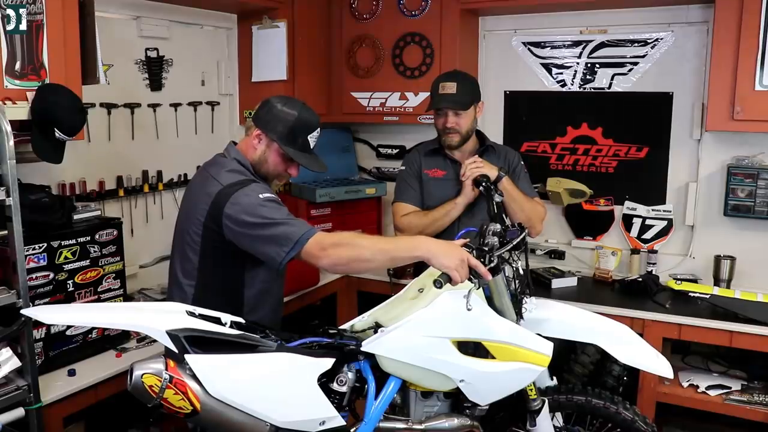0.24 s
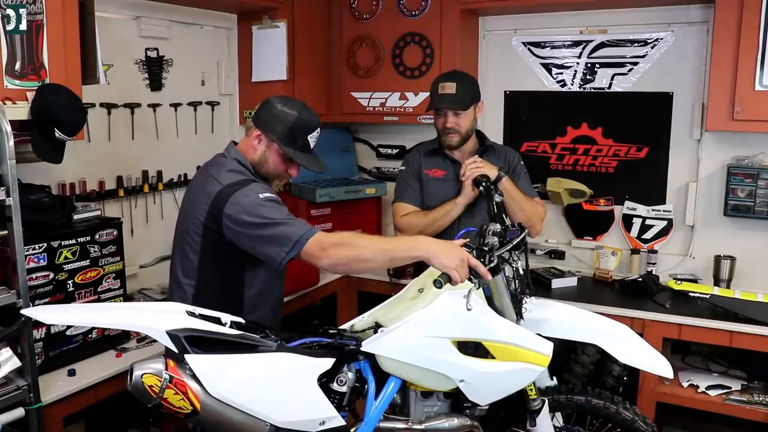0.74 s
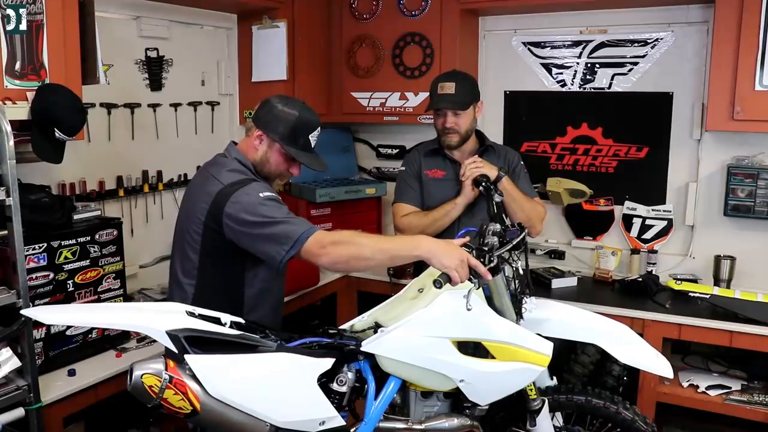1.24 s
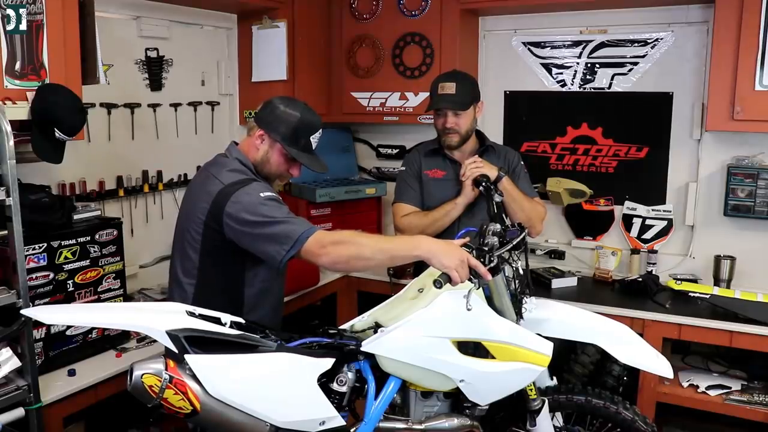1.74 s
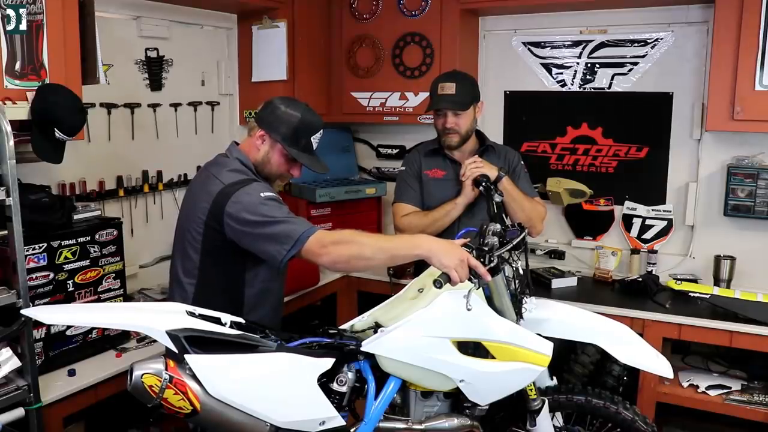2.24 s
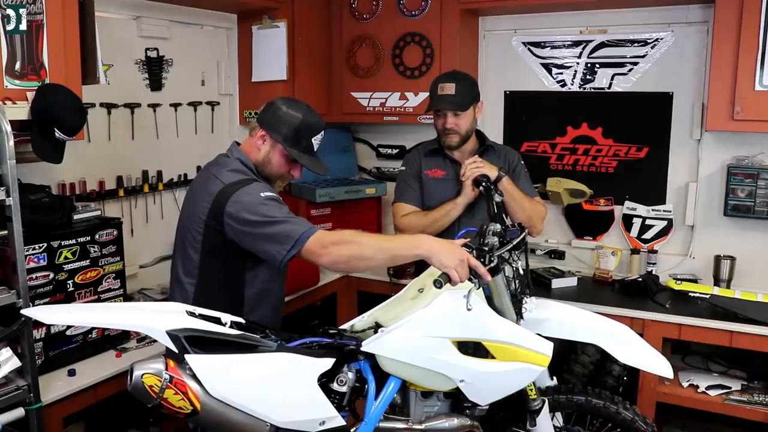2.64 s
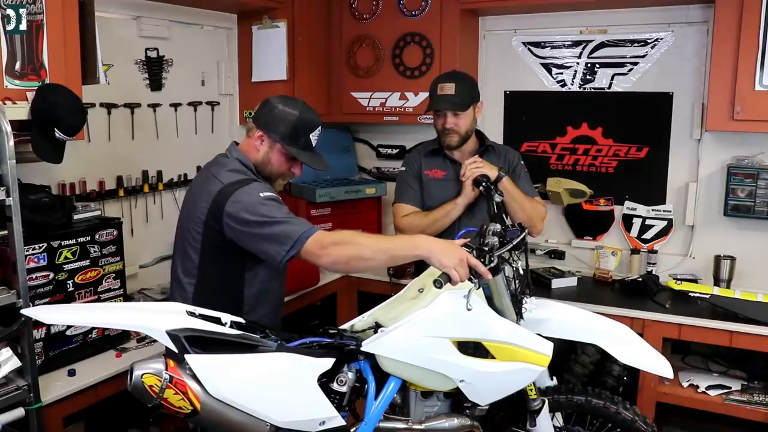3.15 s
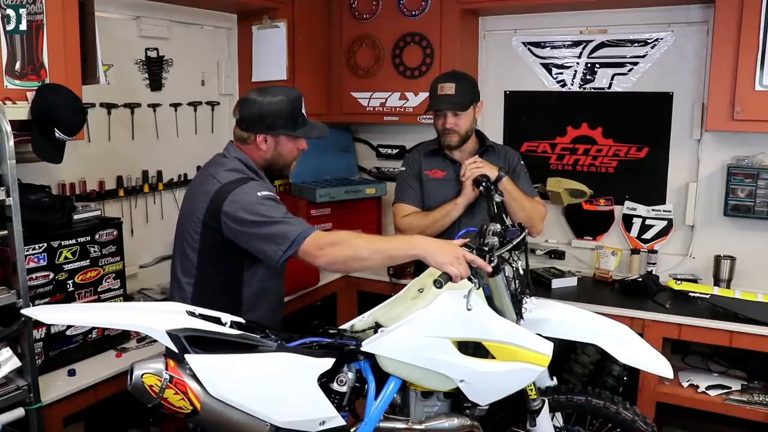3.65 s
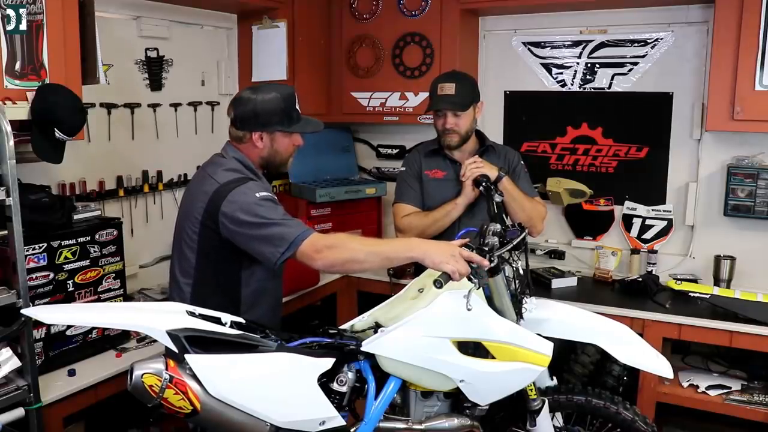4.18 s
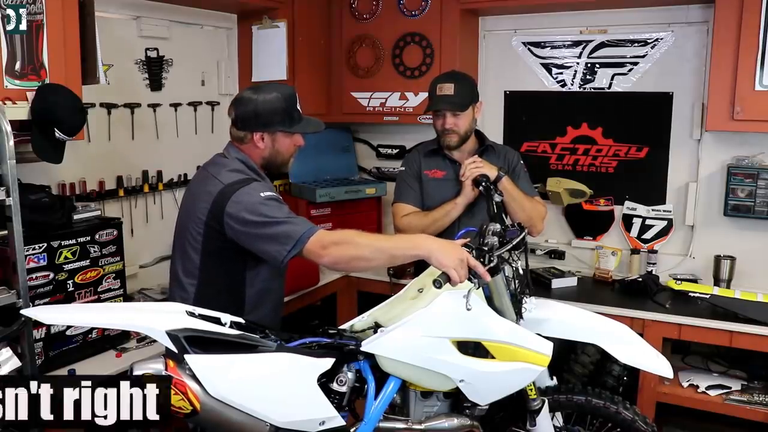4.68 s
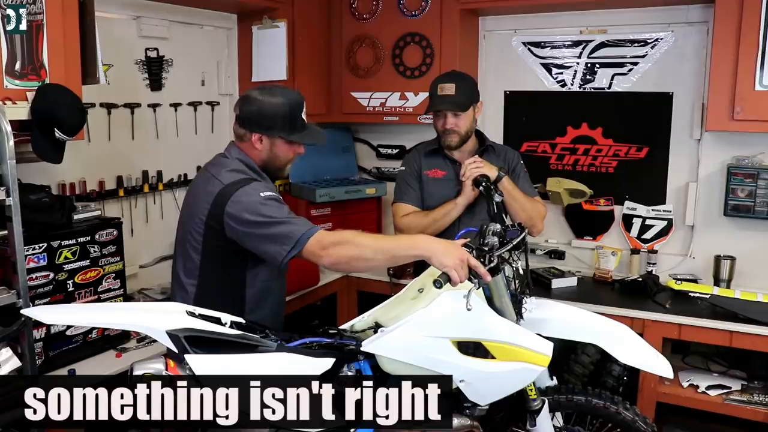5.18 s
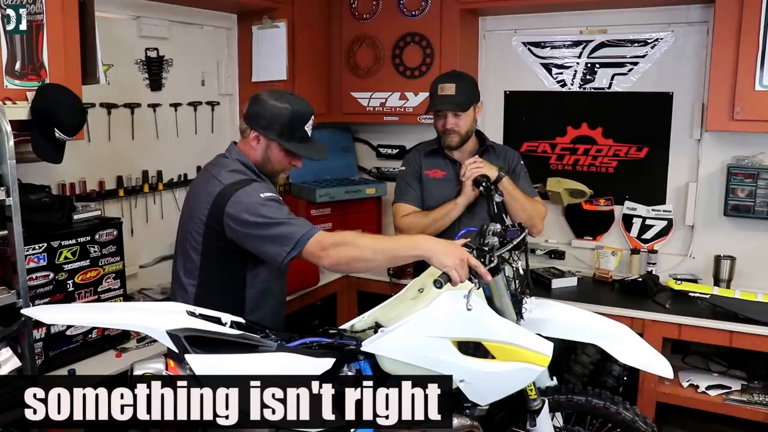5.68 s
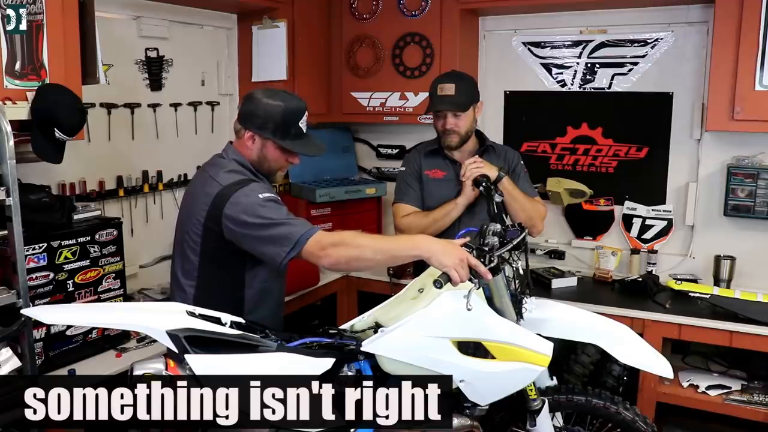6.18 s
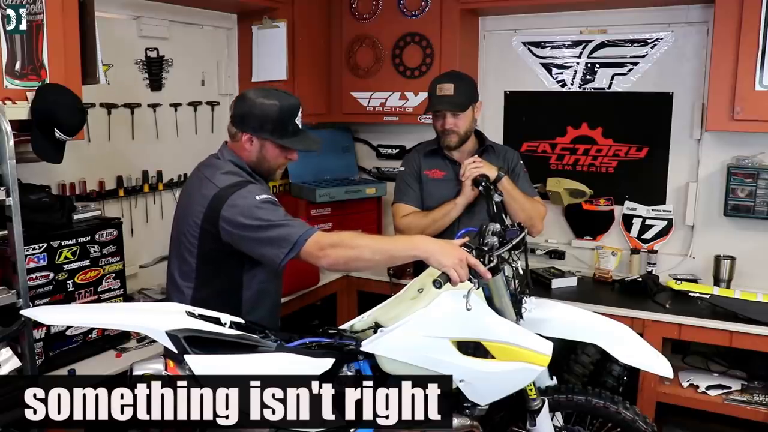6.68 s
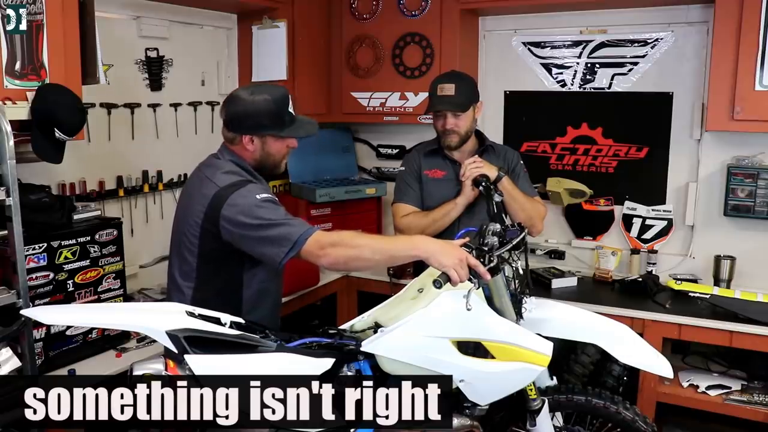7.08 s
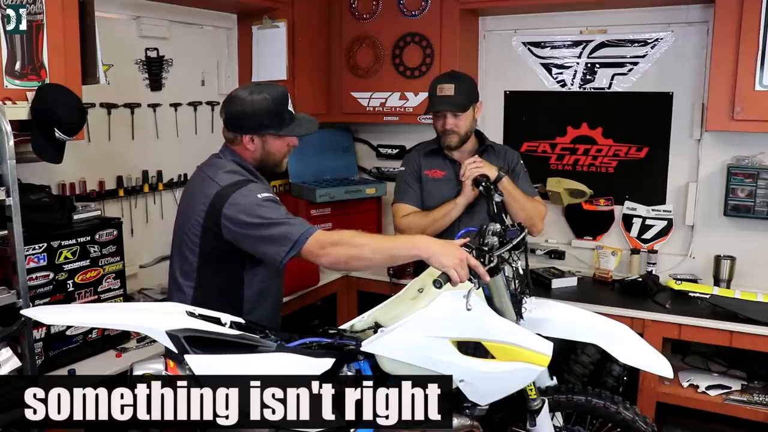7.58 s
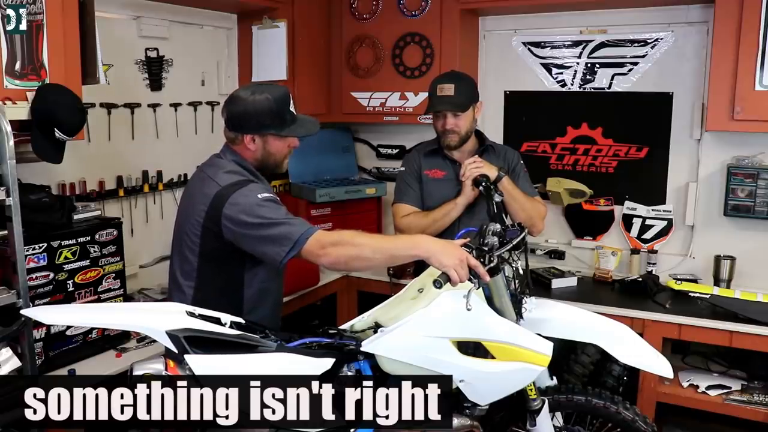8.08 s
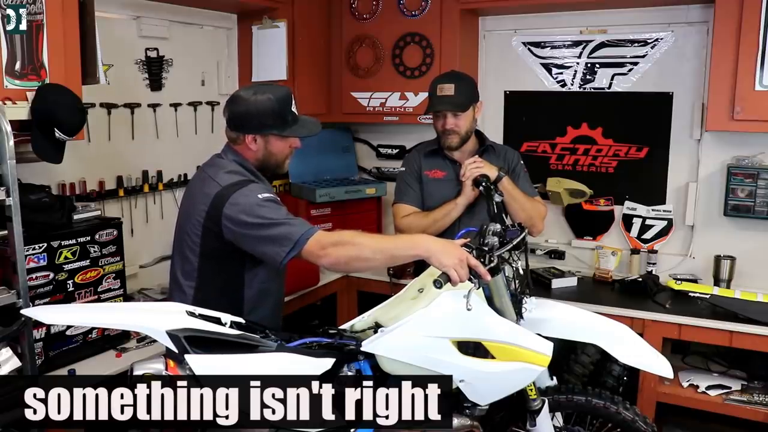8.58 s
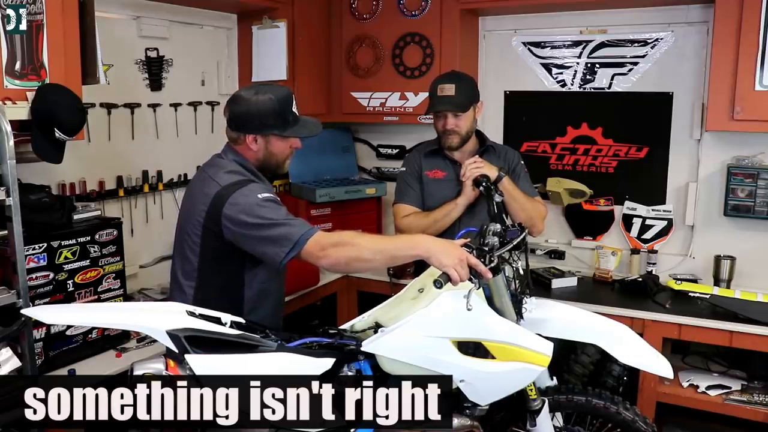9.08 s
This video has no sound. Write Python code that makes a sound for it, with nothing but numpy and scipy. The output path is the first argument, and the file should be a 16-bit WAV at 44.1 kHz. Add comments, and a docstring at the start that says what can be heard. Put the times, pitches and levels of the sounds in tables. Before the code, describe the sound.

Close in a small workshop, a starter already cranking a single-cylinder motorcycle engine whines and rattles with about four dull exhaust thumps a second. It winds down with loose metallic clacks into faint room hush. A hard clack starts a long second crank, which runs down again; after a pause a third, shorter attempt begins. The engine never fires.

```python
"""Starter gears whine and rattle as they crank a single-cylinder motorcycle engine that never fires.
Random tooth clicks excite crankcase modes and a harmonic series follows the tooth rate; each engine
cycle modulates both. Valve puffs excite exhaust-pipe modes, air whistles through gaps, gears clack
taking up slack. Between attempts the gears coast down to the filtered noise of the workshop hush."""
import sys
import numpy as np
from scipy import signal
from scipy.fft import rfft, irfft, next_fast_len
from scipy.io import wavfile
from scipy.ndimage import uniform_filter1d

SR = 44100
rng = np.random.default_rng(int(sys.argv[2]) if len(sys.argv) > 2 else 0)


def output_pcm(signal):
    """Save a mono or channel-first signal as 16-bit PCM at the path in sys.argv[1].

    Samples are clipped to [-1, 1] before scaling.
    """
    pcm = np.clip(np.atleast_2d(signal).T, -1, 1) * 32767
    wavfile.write(sys.argv[1], SR, np.round(pcm).astype(np.int16))


N = 411453  # samples


def gain_of(db):
    """Decibel law: 20 dB is a factor of ten in amplitude."""
    return 10 ** (np.asarray(db) / 20)


def unit_rms(x):
    """Normalization: scales a signal to unit root-mean-square amplitude."""
    return x / np.sqrt(np.mean(x ** 2) + 1e-20)


def add(mix, start_s, sound):
    """Superposition: sums a sound into the mix in place, cropped at both ends."""
    at = round(start_s * SR)
    part = mix[max(at, 0):][:len(sound) + min(at, 0)]
    part += sound[max(-at, 0):][:len(part)]


def colour(x, points):
    """Spectral shaping: multiplies the spectrum by a gain curve of (Hz, dB) points over log frequency."""
    point_hz, point_db = np.transpose(points)
    size = next_fast_len(len(x))
    hz = np.fft.rfftfreq(size, 1 / SR)
    curve_db = np.interp(np.log(hz + 1), np.log(point_hz + 1), point_db)
    return irfft(rfft(x, size) * gain_of(curve_db), size)[:len(x)]


def wander(count, hz):
    """Low-passed noise: random drift of rms 1, slower than the given cutoff."""
    return unit_rms(signal.lfilter(*signal.butter(2, hz, fs=SR), rng.standard_normal(count)))


def filtered(x, order, edge_hz, kind="low"):
    """Band limiting: a causal Butterworth filter."""
    return signal.sosfilt(signal.butter(order, edge_hz, kind, fs=SR, output="sos"), x)


def filtered_in_phase(x, edge_hz, kind="low"):
    """Zero-phase filtering: forward and backward passes, so bands can be subtracted."""
    return signal.sosfiltfilt(signal.butter(2, edge_hz, kind, fs=SR, output="sos"), x)


# spectrum of the workshop background noise: frequency_hz, relative_density_db (per Hz)
HUSH_SPECTRUM = [(25, -13), (55, -1.5), (141, -6.5), (290, -9), (480, -14.5), (900, -12.5), (1500, -15),
                 (16000, -20.5)]
HUSH_DB = -60.3  # rms before the gain control


def hush():
    """Stationary noise: the background is random pressure with a fixed spectrum."""
    return gain_of(HUSH_DB) * unit_rms(colour(rng.standard_normal(N), HUSH_SPECTRUM))


def shop_reverberation(x):
    """Diffuse reverberation: sparse taps of random sign decay, the treble soonest."""
    taps, spacing = np.zeros(SR // 2), 20  # spacing in samples
    at = np.arange(spacing * spacing, len(taps) - spacing, spacing)
    taps[at + rng.integers(0, spacing, len(at))] = rng.choice([-1., 1.], len(at))
    hz, t, spectrum = signal.stft(taps, SR)
    t60 = np.interp(hz, [300, 2000, 8000], [.35, .3, .2])[:, None]
    tail = signal.istft(spectrum * gain_of(-60 * t / t60), SR)[1]
    return signal.oaconvolve(x, tail / np.linalg.norm(tail))[:N]


# a part that rings on after the gears: frequency_hz, relative_level_db, t60_s
LONG_RING = (711, -53.5, 1.9)


def ring_on(x):
    """Sympathetic resonance: the gears shake one lightly damped mode."""
    hz, db, t60 = LONG_RING
    radius = gain_of(-60 / t60 / SR)
    poles = [1, -2 * radius * np.cos(2 * np.pi * hz / SR), radius * radius]
    return gain_of(db) * signal.lfilter([1], poles, np.gradient(x)) / 20


# starter presses: press_s, release_s, spin_up_time_scale, first_compression_sag_hz,
# coasting_rattle_db, rattle_starts_to_die_s
ATTEMPTS = [(-1, .9, 1, 0, -26, 1.49), (2.131, 6.1, 1, 130, -17.5, 6.44), (8.198, 10, .86, 15, -20, 10.4)]


def attempt_at(s):
    """Event order: the latest press at or before s governs."""
    return [a for a in ATTEMPTS if a[0] <= s][-1]


# spin-up shared by every press: since_press_s (before time scaling), tooth_rate_hz (before sag),
# rattle_db, whine_db (both relative to cranking level)
SPIN_UP = [(0, 390, -8, -12), (.04, 640, 4.5, -4), (.108, 970, 1.5, 1), (.125, 1050, -5, -6),
           (.16, 1310, -2.5, -5), (.21, 1670, -1, 3.5), (.33, 1760, 0, -2), (.43, 1925, -.5, 0),
           (.53, 2000, 0, 0)]
# run-down shared by every release: since_release_s, tooth_rate_hz, whine_db (relative to cranking level)
RUN_DOWN = [(0, 2000, 0), (.075, 1770, -10), (.12, 1600, 2), (.165, 1310, 0), (.21, 1090, -13),
            (.3, 880, -22), (.4, 750, -35), (.85, 200, -80)]
FIRST_SQUEEZE_S, SQUEEZE_WIDTH_S = .32, .06  # first compression, in time-scaled seconds


def tooth_rate(t, press_s, release_s, time_scale, sag_hz):
    """Rotor inertia: speed builds after the press, sags at first compression, runs down after release."""
    up, down = np.transpose(SPIN_UP), np.transpose(RUN_DOWN)
    since = (t - press_s) / time_scale
    sag = sag_hz * np.exp(-((since - FIRST_SQUEEZE_S) / SQUEEZE_WIDTH_S) ** 2)
    driven_hz = np.interp(since, up[0], up[1]) - sag
    return np.minimum(driven_hz, np.interp(t - release_s, down[0], down[1]))


FULL_HZ = 2000  # tooth rate at cranking speed


def pace_at(s):
    """Speed ratio: the tooth rate as a share of full cranking speed."""
    return tooth_rate(s, *attempt_at(s)[:4]) / FULL_HZ


# engine cycles: exhaust_thump_s, preceding_whistle_db (relative)
BEATS = [(0.19, -17), (0.435, -17), (0.679, -14), (0.927, -17), (2.549, -14.5), (2.8, -12.5), (3.049, -12),
         (3.297, -16), (3.543, -14), (3.789, -17.5), (4.03, -18.5), (4.271, -26), (4.512, -20),
         (4.754, -19), (5.002, -15), (5.249, -15), (5.498, -12.5), (5.746, -17.5), (5.995, -14.5),
         (6.252, -17.5), (8.455, -17.5), (8.719, -12), (8.971, -12.5), (9.217, -18)]


def crank_angle(t):
    """Phase interpolation: share of the cycle since the last thump, with one cycle added around each run."""
    s = np.array(BEATS)[:, 0]
    runs = np.split(s, np.where(np.diff(s) > 1)[0] + 1)
    s = np.concatenate([np.r_[2 * r[0] - r[1], r, 2 * r[-1] - r[-2]] for r in runs])
    return np.interp(t, s, np.arange(len(s))) % 1


# throttle: time_s, opening (0-1)
THROTTLE = [(3.55, .12), (3.78, .95), (4.52, .88), (4.76, .2), (5.3, .06)]


def throttle_at(s):
    """Linear interpolation: the throttle moves steadily between set openings."""
    return np.interp(s, *np.transpose(THROTTLE))


# exhaust-pipe modes: frequency_hz, relative_level_db, t60_s
PIPE = [(58, -1.5, 0.12), (114, 0, 0.027), (159.7, -8, 0.15)]


def puff(peak_db, width_s, bass_db):
    """Pipe resonance: a gulp of air through a valve sucks first, then excites the pipe modes."""
    t = np.arange(0, .25, 1 / SR)
    ring = np.zeros(len(t))
    for hz, mode_db, t60 in PIPE:
        level_db = mode_db + bass_db * (hz < 80)
        ring -= gain_of(level_db - 60 * t / t60) * np.cos(2 * np.pi * hz * t)
    gulp = np.hanning(round(width_s * SR))
    out = filtered(signal.oaconvolve(ring, gulp), 2, 48, "high")
    return gain_of(peak_db) * out / abs(out).max()


# puff as the piston starts to move: start_s, peak_db
FIRST_PUFF = (2.239, -22)
# air box resonance: frequency_hz, t60_s
AIRBOX = (265, 0.14)
# thump peak, its weakening while the press lasts, and its drop for a total loss of speed
THUMP_DB, THUMP_TIRE_DB_PER_S, THUMP_SLOW_DB = -14.3, .85, 16


def valves():
    """Periodic gas exchange: a lesser puff, exhaust thump and soft after-push; throttle rings the air box."""
    out, t = np.zeros(N), np.arange(0, .12, 1 / SR)
    box_hz, box_t60 = AIRBOX
    box = np.sin(2 * np.pi * box_hz * t) * gain_of(-60 * t / box_t60) * np.minimum(t / 0.006, 1)
    first_s, first_db = FIRST_PUFF
    add(out, first_s - .006, puff(first_db, 0.012, 2.1))
    for s, _ in BEATS:
        tired_db = THUMP_TIRE_DB_PER_S * (s - attempt_at(s)[0])
        thump_db = THUMP_DB - tired_db - THUMP_SLOW_DB * (1 - pace_at(s))
        throttle = throttle_at(s)
        lead = (.084 - 0.00643 * throttle) / np.sqrt(pace_at(s - .04))
        add(out, s - .004, puff(thump_db, 0.0076, 0))
        add(out, s - lead - .003, puff(thump_db - 2.5 - 9 * throttle, .006, -3.5))
        add(out, s + .062, puff(thump_db - 14, .013, 5))
        add(out, s - lead - .008, gain_of(-24.5) * throttle * box)
    return out


# lead over the thump and pitch at full speed; rise in pitch for a fully open throttle
SQUEAK_LEAD_S, SQUEAK_HZ, SQUEAK_OPEN_HZ = .052, 7650, 230


def cycle_squeaks():
    """Speed scaling: a whistle leads each thump, earlier and lower when the crank is slow."""
    for s, db in BEATS:
        lead = SQUEAK_LEAD_S / pace_at(s - SQUEAK_LEAD_S / 2)
        pitch_hz = SQUEAK_HZ * pace_at(s - lead) ** .15 + SQUEAK_OPEN_HZ * throttle_at(s)
        yield s - lead, db, pitch_hz


# whistles between cycles while the speed changes: time_s, relative_level_db, nominal_pitch_hz
SQUEAKS = [(1.04, -19.5, 7270), (2.374, -12, 6860), (2.537, -12, 7600), (8.441, -17, 7280),
           (8.578, -15, 7200), (8.725, -20, 7760)]


def squeaks():
    """Flow whistle: air forced through a gap sounds quickly, slides down in pitch and fades."""
    out, t = np.zeros(N), np.arange(round(.06 * SR)) / SR
    burst = (t / 0.0052) ** 2 * np.exp(2 - 2 * t / 0.0058)
    shape = burst + 0.24 * np.sin(np.pi * t / t[-1])
    for s, db, hz in SQUEAKS + list(cycle_squeaks()):
        slide_hz = hz * (1 + .05 * np.exp(-t / 0.00417) - 0.34 * t)
        rough = 1 + .5 * wander(len(t), hz=200)
        tone = np.sin(2 * np.pi * np.cumsum(slide_hz) / SR)
        add(out, s - .006, gain_of(db - 1.5) * shape * rough * tone)
    return out


# modes of crankcase and covers: frequency_hz, width_hz, relative_level_db
CASE = [(672, 20, -8), (734, 20, -2.5), (1328, 18, 3), (1497, 46, -1), (1910, 240, -5), (3200, 90, -7.5),
        (3770, 24, -21), (4125, 70, -11.5), (5330, 120, -11.5), (5810, 67, -20), (6170, 17, -11),
        (7240, 57, -13), (7430, 110, -11.5), (8110, 67, -16), (12400, 600, -19.5), (13700, 107, -25)]


def case_ring(seconds=.08):
    """Modal superposition: the case impulse response sums damped modes, wider ones dying sooner."""
    t = np.arange(round(seconds * SR)) / SR
    ring = np.zeros(len(t))
    for hz, width, db in CASE:
        peak = gain_of(db) * 2 * np.pi * width / SR  # keeps the spectral peak independent of width
        ring += peak * np.exp(-np.pi * width * t) * np.sin(2 * np.pi * hz * t)
    return ring


def through_case(x):
    """Linear response: convolution with the impulse response of the case."""
    return signal.oaconvolve(x, case_ring())[:len(x)]


# gears take up slack: start_s, relative_level_db, t60_s, loosened_rattle_db
CLACKS = [(1.176, -21, 0.065, -11), (1.314, -15.5, 0.04, -13), (2.131, -9.5, 0.046, -30),
          (6.67, -52, .05, -36), (8.198, -14, 0.04, -30), (8.209, -10, .03, -30)]
# spectrum of the contact burst: frequency_hz, relative_density_db (per Hz)
CLACK_SPECTRUM = [(150, -20), (300, -3), (520, -12), (1200, 0), (5150, -0.5), (9080, -4.5), (16000, -30)]


def clacks():
    """Impact excitation: a sudden decaying burst of metal contact also rings the case."""
    out, t = np.zeros(N), np.arange(0, .12, 1 / SR)
    for s, db, t60, _ in CLACKS:
        noise = unit_rms(colour(rng.standard_normal(len(t)), CLACK_SPECTRUM))
        burst = noise * gain_of(db - 60 * t / t60)
        add(out, s, burst + 3 * through_case(burst))
    return out


RATTLE_DB, WHINE_DB = -15.2, -17.8  # relative levels at cranking speed
TIRE_DB_PER_S = .4  # gears weaken as the battery tires
SHAKE_RISE_S, SHAKE_DB_PER_S = .02, 170  # rattle shaken loose by a clack: rise and decay
SETTLE_AFTER_S, SETTLE_S = .15, .17  # after release the rattle moves to its coasting level
DIE_DB_PER_S, DIE_DB_PER_S2 = 92, 100  # then it dies ever faster


def course(press_s, release_s, time_scale, sag_hz, coast_db, die_s):
    """Energy addition: times, tooth rate, rattle dB and whine dB, with loosened rattle summed as power."""
    up, down = np.transpose(SPIN_UP), np.transpose(RUN_DOWN)
    t = np.arange(max(press_s, 0), min(release_s + 1, N / SR), 1 / SR)
    since_press = (t - press_s) / time_scale
    tired_db = -TIRE_DB_PER_S * (np.minimum(t, release_s) - press_s)
    settled = np.clip((t - release_s - SETTLE_AFTER_S) / SETTLE_S, 0, 1)
    driven_db = RATTLE_DB + tired_db + np.interp(since_press, up[0], up[2])
    dying = np.maximum(t - die_s, 0)
    died_db = dying * (DIE_DB_PER_S + DIE_DB_PER_S2 * dying)
    power = gain_of(driven_db + settled * (coast_db - driven_db) - died_db) ** 2
    for s, _, _, shake_db in CLACKS:
        since = np.maximum(t - s, 0)
        rise = np.minimum(since / SHAKE_RISE_S, 1)
        power = power + (rise * gain_of(shake_db - SHAKE_DB_PER_S * since)) ** 2
    whine_db = WHINE_DB + tired_db + np.interp(since_press, up[0], up[3])
    whine_db = whine_db + np.interp(t - release_s, down[0], down[2])
    return t, tooth_rate(t, press_s, release_s, time_scale, sag_hz), 10 * np.log10(power), whine_db


# one engine cycle from the exhaust thump: cycle_share, tooth_load_db, speed_factor
CYCLE = [(0.02, 0, 1.01), (.33, 1, 1.035), (.49, 0, .96), (.57, -7, .935), (.69, -9.5, .93),
         (.72, 1.5, 1.045), (.83, -2, .97), (.94, -11.5, .95), (.96, 1, 1.02)]
# load ripples after the thump; all but the level are shares of the cycle
SHUDDER_DB, SHUDDER_SHARE, SHUDDER_FIRST, SHUDDER_FADE = 3.5, .073, .047, .35


def cycle_load(t, hz):
    """Cyclic modulation: tooth load in dB and the tooth rate as compression varies the speed."""
    grip = np.clip((hz - 1400) / 550, 0, 1)  # the cycle shows once the crank is up to speed
    share, load_db, speed = np.transpose(CYCLE)
    angle = crank_angle(t)
    ripple = np.cos(2 * np.pi * (angle - SHUDDER_FIRST) / SHUDDER_SHARE)
    shudder_db = SHUDDER_DB * ripple * np.exp(-(angle / SHUDDER_FADE) ** 2)
    load_db = grip * (np.interp(angle, share, load_db, period=1) + shudder_db)
    return load_db, hz * (1 + grip * (np.interp(angle, share, speed, period=1) - 1))


# broad rattle spectrum under the case rings: frequency_hz, relative_density_db (per Hz)
RATTLE_SPECTRUM = [(110, -55), (220, -28), (450, -33), (700, -5.5), (1200, -2.5), (2200, 2.5), (3400, -1),
                   (4700, -7), (8300, -6.5), (9300, -19.5), (13000, -17), (16000, -28)]


def gear_rattle(load_db, bright_db):
    """Random impact noise: loose teeth click into the case; load and brightness weight four bands."""
    count = len(load_db)
    struck = rng.random(count) < .35
    clicks = struck * rng.standard_normal(count) * gain_of(1.15 * rng.exponential(1, count))
    clicks = clicks * gain_of(.8 * wander(count, hz=70))  # flutter
    broad = unit_rms(colour(clicks, RATTLE_SPECTRUM))
    rattle = unit_rms(broad + gain_of(-7.5) * unit_rms(through_case(clicks)))
    treble = filtered_in_phase(rattle, 4500, "high")
    top = filtered_in_phase(rattle, 9000, "high")
    low = filtered_in_phase(rattle, 1300)
    return (low * gain_of(.5 * load_db - 0.1 * bright_db)
            + (rattle - treble - low) * gain_of(0.33 * load_db + .5 * bright_db)
            + (treble - top) * gain_of(0.65 * load_db + .5 * bright_db)
            + top * gain_of(0.85 * load_db + 1.7 * bright_db))


def broken(turns):
    """Random quadrature modulation: uneven teeth break a tone into short flares."""
    a, b = wander(len(turns), hz=44.7), wander(len(turns), hz=44)
    return (.6 + .55 * a) * np.sin(2 * np.pi * turns) + .55 * b * np.cos(2 * np.pi * turns)


# harmonics of the tooth rate: multiple, at_speed_db, hauling_from_low_speed_db (relative)
WHINE = [(1, -7, 2), (2, -1, 2), (3, -5, -3), (4, -9, -3), (5, -12, -6), (6, -10, -12), (7, -13, -14)]


def gear_whine(meshing_hz, slow_hz, level_db):
    """Gear meshing: harmonics of a wavering tooth rate sound directly and through the case modes."""
    wobble = 1 + 0.00605 * wander(len(meshing_hz), hz=100)
    turns = np.cumsum(meshing_hz * wobble) / SR
    heave = np.clip(3.5 - slow_hz / 420, 0, 1)  # hauling from low speed, the low multiples growl
    teeth = sum(gain_of(db + heave * (haul_db - db)) * broken(k * turns) for k, db, haul_db in WHINE)
    teeth = teeth * gain_of(level_db)
    direct = filtered(teeth, 2, [720, 5400], "band")
    whine = .7 * direct + 3.3 * through_case(teeth)  # loud where a harmonic meets a mode
    return whine + gain_of(-11) * filtered(teeth, 4, 5200, "high")  # thin overtones


def gears(t, hz, rattle_db, whine_db):
    """Load-dependent contact: start time and sound of clicking loose teeth and whining loaded teeth."""
    load_db, cyclic_hz = cycle_load(t, hz)
    coasting = np.clip((-13 - rattle_db) / 15, 0, 1)
    # slow, unloaded teeth strike softly: duller
    bright_db = np.log2(np.minimum(hz / 1900, 1)) * (4 + 9 * coasting)
    rattle = gain_of(rattle_db) * gear_rattle(load_db, bright_db)
    # the growl follows the cyclic speed as well
    whine = gear_whine(cyclic_hz, cyclic_hz, whine_db + .8 * load_db)
    return t[0], filtered(rattle + whine, 2, 230, "high")


def scene():
    """Superposition: metal and whistles, their reverberation and long ring, valve puffs and hush."""
    metal = clacks() + squeaks()
    for attempt in ATTEMPTS:
        add(metal, *gears(*course(*attempt)))
    reverberation = gain_of(-10.5) * shop_reverberation(metal)
    return (metal + reverberation + ring_on(metal) + valves() + hush())[None]


EDGE_HZ = 15850  # upper band limit


def record(dry):
    """Automatic gain: creeps up in quiet moments and drops at once; peaks clip; then the band limit."""
    power_db = 10 * np.log10(abs(uniform_filter1d(dry[0] ** 2, size=300)) + 1e-12)
    climb_db = np.arange(N) * 5.8 / SR  # 5.8 dB a second
    room_db = np.maximum(-48.5 - power_db, 0)
    lift_db = np.minimum.accumulate(room_db * 3 - climb_db) + climb_db
    lift_db = np.minimum(lift_db, 5)
    loud = np.clip(dry * gain_of(lift_db), -1, 1)
    band_limit = signal.firwin(511, EDGE_HZ, window=("kaiser", 11), fs=SR)
    return signal.oaconvolve(loud, band_limit[None], "same")


dry = scene()
out = record(dry)
output_pcm(out)
```